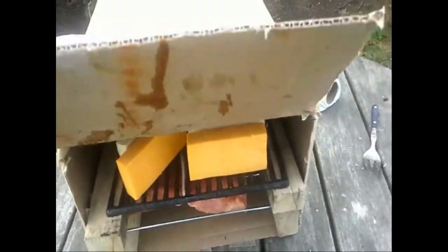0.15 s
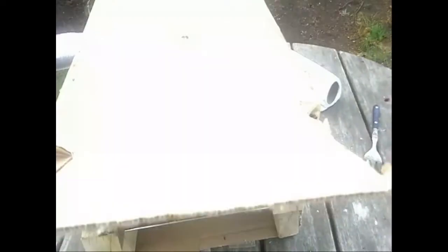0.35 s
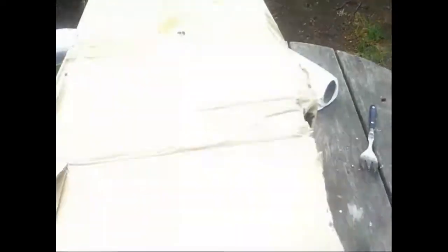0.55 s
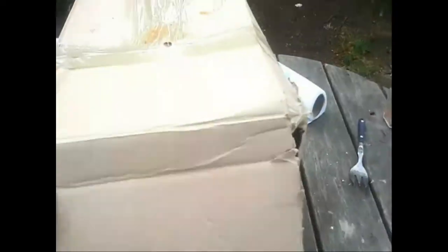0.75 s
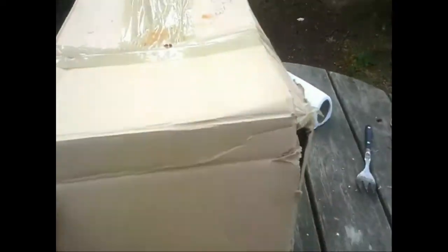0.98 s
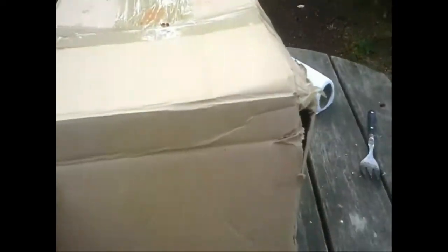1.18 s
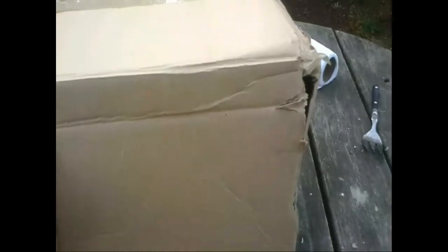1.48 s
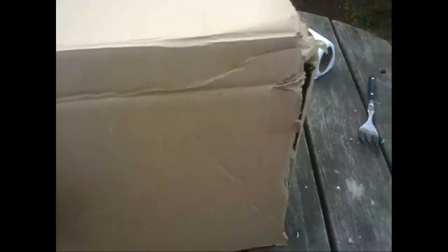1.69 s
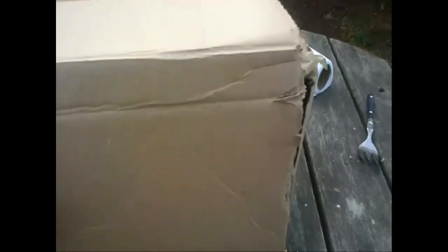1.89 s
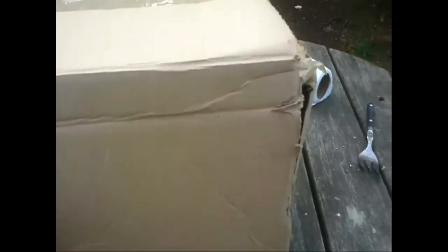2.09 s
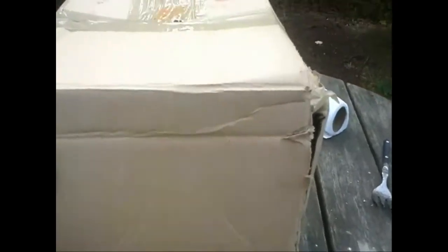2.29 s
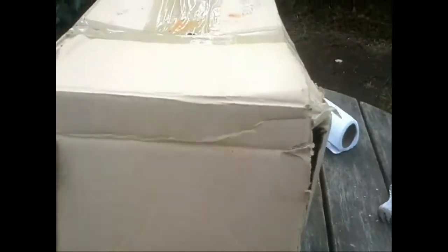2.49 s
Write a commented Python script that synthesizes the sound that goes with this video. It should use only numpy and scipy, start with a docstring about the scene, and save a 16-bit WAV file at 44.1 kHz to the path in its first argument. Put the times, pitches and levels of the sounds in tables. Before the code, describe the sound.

A cardboard flap rubs into its box, jams with a crunch, then scrapes closed.

```python
"""Closing a cardboard box

Short bursts of low thump and hiss, with a brief ring, open the scene. On an outdoor table, a flap slides
in between the box's side walls with a hollow hiss, jams with a crunch, creaks and is pushed home in a
second long scrape. The rubbing is paper fibres catching and letting go, ringing the gap and the panels.
Creases snap, the walls knock as they flex, and handling shakes the box with a low rumble."""
import sys
import numpy as np
from scipy import signal
from scipy.fft import rfft, irfft
from scipy.io import wavfile
from scipy.ndimage import uniform_filter1d, map_coordinates

SR = 44100
rng = np.random.default_rng(int(sys.argv[2]) if len(sys.argv) > 2 else 0)


def to_wav(s):
    """Save 16-bit WAV."""
    ch = np.atleast_2d(s).T  # columns
    pcm = np.round(np.clip(ch, -1, 1) * 32767)  # PCM
    wavfile.write(sys.argv[1], SR, pcm.astype(np.int16))


N = 116865
T = np.arange(N) / SR


def from_db(db):
    """Decibels to gain."""
    return 10 ** (np.asarray(db) / 20)


def unit_power(x):
    """Scale to an RMS of one."""
    return x / np.sqrt(np.mean(x ** 2) + 1e-20)


def fader(curve):
    """Gain riding a (time_s, level_db) curve, silent outside it."""
    time_s, level_db = np.transpose(curve)
    return from_db(np.interp(T, time_s, level_db, left=-140, right=-140))


def burst(start_s, length_s, attack_s, fall_db_per_s):
    """Envelope that rises smoothly and begins to die away length_s after its start."""
    rise = np.clip((T - start_s) / attack_s, 0, 1) ** 2
    return rise * from_db(-fall_db_per_s * np.maximum(T - start_s - length_s, 0))


def noise():
    """White noise."""
    return rng.standard_normal(N)


def colour(x, spectrum):
    """Minimum-phase EQ through (freq_hz, gain_db) points; unit power."""
    freq_hz, gain_db = np.transpose(spectrum)
    bins_hz = np.maximum(np.arange(N + 1) * SR / (2 * N), 1)
    gain = from_db(np.interp(np.log(bins_hz), np.log(freq_hz), gain_db))
    gain /= np.sqrt(1 + (freq_hz[0] / 2 / bins_hz) ** 4)  # low cut an octave under the first point
    cepstrum = irfft(np.log(gain))[:N]
    cepstrum[1:] *= 2
    response = np.exp(rfft(cepstrum, 2 * N))
    return unit_power(irfft(rfft(x, 2 * N) * response)[:N])


def resonate(x, modes):
    """Parallel resonances of alternating polarity, each with its own share of the power."""
    out = 0
    for k, (pitch_hz, width_hz, level_db) in enumerate(modes):
        radius = np.exp(-np.pi * width_hz / SR)
        poles = [1, -2 * radius * np.cos(2 * np.pi * pitch_hz / SR), radius * radius]
        ring = unit_power(signal.lfilter([1, 0, -1], poles, x))
        out += (-1) ** k * from_db(level_db) * ring
    return unit_power(out)


def steady(x):
    """Even out the swells of a narrow-band vibration; unit power."""
    x = unit_power(x)
    local_power = uniform_filter1d(x * x, size=1300)
    return unit_power(x / np.sqrt(local_power + 1e-2))


def drift(rate_hz):
    """Smooth random wandering with a spread of one."""
    step = 40
    pole = np.exp(-2 * np.pi * rate_hz * step / SR)
    count = N // step + 2
    slow = signal.lfilter([1], [1, -2 * pole, pole * pole], rng.standard_normal(2 * count))[count:]
    return np.interp(np.arange(N) / step, np.arange(count), unit_power(slow))


def board_paths(x, count=14, depth=0.75, delay_range_s=(0.0007, 0.0045)):
    """As the contact point travels, paths through the board come and go, so the colour keeps shifting."""
    paths = 0
    for delay_s in rng.uniform(*delay_range_s, count):
        paths += drift(rate_hz=8) * np.pad(x, (int(delay_s * SR), 0))[:N]
    return unit_power(x + depth * unit_power(paths))


def friction(judder_db=1.54, grains_per_s=3500, grain_spread_db=3, hiss_gain=0.7):
    """Fibres catch and let go: tiny clicks over hiss, bunched by uneven stick and slip."""
    sizes = from_db(grain_spread_db * np.minimum(rng.exponential(1, N), 4))
    polarity = rng.choice([-1, 1], N)
    grains = unit_power(sizes * polarity * (rng.random(N) < grains_per_s / SR))
    rub = board_paths(grains + hiss_gain * noise())
    return unit_power(rub * from_db(judder_db * drift(rate_hz=146)))


# Tone of the outdoor air: freq_hz, gain_db
AIR_EQ = [(25, 0), (100, -10), (240, -18), (2000, -27), (2330, -12.5), (3000, -24), (3700, -15),
          (4700, -21), (10000, -21), (12500, -27), (16000, -39)]


def air():
    """Still air lays a faint noise bed under the scene."""
    return from_db(-88) * colour(noise(), AIR_EQ)


# Short bursts of thump and hiss: start_s, length_s, hiss_db, ring_db, thump_db
THUMP_BURSTS = [(-.01, 0.0083, -64, -64.5, -59), (0.067, 0.0079, -61, -54, -56),
                (0.096, 0.026, -65.5, -69.5, -54.5), (0.142, 0.046, -67.5, -75, -56.5),
                (0.204, 0.01, -65.5, -80, -54), (0.413, 0.025, -65.5, -73, -51),
                (0.466, 0.033, -62, -55.5, -53.5), (0.506, .032, -61, -81, -50.5),
                (0.544, 0.049, -68, -65, -52), (0.607, 0.033, -56, -56, -56),
                (0.687, 0.04, -62, -68.5, -56), (0.772, 0.025, -61, -62, -53),
                (0.819, 0.0051, -62, -66, -50.5), (0.849, 0.015, -59.5, -75, -49),
                (0.932, 0.014, -64, -66, -62), (0.967, 0.011, -58.5, -65, -56)]
# Hissy top and soft low end of a burst: freq_hz, gain_db
HISS_EQ = [(120, -42), (200, -11), (278, -12), (387, -11.5), (432, -8), (1120, -10.5), (1590, -7.5),
           (2510, -5.5), (3830, -9), (4520, -4.5), (5940, -15), (7540, -12), (16000, -13.5)]
THUMP_EQ = [(20, -22), (40, 10), (75, -9.5), (130, -20.5), (250, -27.5), (600, -56.5)]
# Brief ring in each burst: pitch_hz, width_hz, level_db
RING_MODES = [(1540, 77, -7), (1830, 60, -28), (2360, 54, -11), (2830, 57, -18), (3740, 320, 4),
              (4470, 240, -17), (5230, 130, -2.5), (5980, 130, 3), (6760, 530, 0)]


def thump_bursts():
    """Short, gated-sounding bursts of low thump and hiss, with a brief ring."""
    start_s, length_s, hiss_db, ring_db, thump_db = np.transpose(THUMP_BURSTS)[:, :, None]
    top_envelopes = burst(start_s, length_s, attack_s=0.013, fall_db_per_s=665)
    low_envelopes = burst(start_s, length_s, attack_s=0.006, fall_db_per_s=1160)
    hiss = (from_db(hiss_db) * top_envelopes).sum(axis=0) * colour(friction(judder_db=1.3), HISS_EQ)
    ring = (from_db(ring_db) * top_envelopes).sum(axis=0) * resonate(friction(judder_db=-0.5), RING_MODES)
    thump = (from_db(thump_db) * low_envelopes).sum(axis=0) * steady(colour(noise(), THUMP_EQ))
    return hiss + ring + thump


# Creases giving way: start_s, level_db, pitch_hz, width_hz
CRACKS = [(0.539, -56, 2380, 200), (0.591, -37, 5340, 1500), (1.014, -42, 2960, 2500),
          (1.337, -31.5, 4040, 1500), (1.49, -28, 6000, 1300), (1.601, -20.5, 8400, 1500),
          (1.616, -24, 1570, 397), (1.625, -23, 4400, 1000), (1.642, -23.5, 3750, 1300),
          (1.679, -27, 5400, 2000), (1.7009, -26.5, 1390, 890), (1.753, -29, 5440, 4500),
          (1.827, -25.5, 1700, 1700), (1.83, -42, 4000, 1500), (2.411, -26, 5170, 1390),
          (2.4298, -18.5, 3480, 300), (2.44, -32.5, 4007, 399.7), (2.541, -33, 3940, 2000),
          (2.565, -32, 5070, 2020)]


def cracks():
    """A crease gives way in a few milliseconds of snapping fibres: a ring over a broad crunch."""
    crunch = 0.54 * colour(noise(), JAM_EQ)  # shares the tone of the jamming edge
    out = 0
    for start_s, level_db, pitch_hz, width_hz in CRACKS:
        snap = unit_power(crunch + resonate(noise(), [(pitch_hz, width_hz, 0)]))
        envelope = burst(start_s, length_s=0.00067, attack_s=0.0022, fall_db_per_s=2000)
        out += from_db(level_db) * envelope * snap
    return out


# Swell of the passing edge: time_s, level_db
SWEEP_FADER = [(.54, -78), (.57, -51.5), (.597, -45.5), (.622, -42.5), (.648, -54.5), (.675, -79)]
# Its tone: freq_hz, gain_db
SWEEP_EQ = [(88, -50), (150, -17), (235, 5.5), (321, -10), (923, -20), (1560, 1.5), (2870, -21), (3490, 1),
            (5150, 0.5), (5910, -9), (6770, 0.5), (7470, -10.5), (11300, -20), (12900, -9), (16000, -22)]


def sweep():
    """The flap's edge sweeps past the wall in one quick swish."""
    return fader(SWEEP_FADER) * colour(friction(judder_db=2.5), SWEEP_EQ)


# Swells of handling rumble: time_s, level_db
RUMBLE_FADER = [(.99, -76), (1.04, -59), (1.14, -56.5), (1.24, -51), (1.29, -62), (1.36, -48), (1.5, -60),
                (1.62, -48.5), (1.76, -47), (1.9, -46), (1.98, -49), (2.06, -47), (2.16, -51), (2.32, -46),
                (2.39, -54), (2.47, -46.5), (2.56, -52), (2.65, -54)]
# Its deep tone: freq_hz, gain_db
RUMBLE_EQ = [(20, -20), (28, -15.5), (39, 10.5), (56, -6), (75, -3.5), (115, -16), (250, -18), (600, -34)]


def rumble():
    """Handling shakes the whole box."""
    return fader(RUMBLE_FADER) * steady(colour(noise(), RUMBLE_EQ))


# Contour of the sliding hiss, ahead of its trim: time_s, level_db
SLIDE_FADER = [(1.006, -55), (1.016, -54), (1.08, -46), (1.115, -42.5), (1.18, -43.5), (1.26, -38.5),
               (1.29, -41), (1.35, -42.5), (1.53, -38), (1.555, -43.5), (1.65, -38.5), (1.79, -46),
               (1.91, -40.5), (2.0, -37), (2.2, -41.5), (2.46, -38.5), (2.57, -36.5), (2.65, -41.5)]
# Its tone: freq_hz, gain_db
SLIDE_EQ = [(88, -51.5), (150, -8), (315, -2.5), (524, 2.5), (689, -27), (1210, -29), (2310, 9.5),
            (3160, 0.5), (3490, -12.5), (3770, -2.5), (5790, 3.5), (7470, -7.5), (11000, -9), (12400, -6.5),
            (16000, -12)]


def slide(trim_db=-7):
    """Board hisses as it slides smoothly on board."""
    return fader(SLIDE_FADER) * from_db(trim_db) * colour(friction(judder_db=1.6), SLIDE_EQ)


# The edge scraping as it enters, jams and is pushed home: time_s, level_db
ENTRY_FADER = [(1.008, -72), (1.017, -42.5), (1.04, -47.5), (1.075, -40), (1.125, -50.5), (1.30, -53.5),
               (1.347, -36), (1.372, -44), (1.39, -45.5), (1.495, -41), (1.532, -37), (1.554, -50)]
JAM_FADER = [(1.559, -50), (1.57, -36), (1.586, -33), (1.604, -27.5), (1.646, -28.5), (1.66, -35),
             (1.684, -31), (1.701, -37.5), (1.715, -47), (1.754, -36.5), (1.784, -50), (1.828, -37),
             (1.86, -48), (1.948, -50.5)]
PUSH_FADER = [(1.959, -56.5), (2.016, -42.5), (2.049, -34), (2.07, -38.5), (2.108, -38.5), (2.128, -32.5),
              (2.175, -39.5), (2.23, -37.5), (2.292, -37), (2.32, -38), (2.38, -36), (2.43, -33.5),
              (2.46, -37), (2.51, -45), (2.57, -50.5), (2.65, -48.5)]
# Tone of each stroke: freq_hz, gain_db
ENTRY_EQ = [(59, -61), (100, -24), (156, -40), (239, 1), (634, -1), (736, -4), (1230, -8), (1580, 4),
            (3050, -5.5), (3620, 5.5), (4980, -1), (6560, -4), (7770, -3), (13800, -12), (16000, -16.5)]
JAM_EQ = [(47, -18), (80, -30), (107, -1.5), (265, -7), (346, -9), (575, -7.5), (687, 0.5), (820, -14),
          (937, -3), (1400, -3), (1560, 1), (1740, -6), (1900, -2), (2220, -7), (2900, -8), (3870, -2),
          (6740, -10.5), (10500, -11.5), (11500, -16.5), (12500, -16), (16000, -28)]
PUSH_EQ = [(59, -55), (100, -13.5), (210, -17), (271, -13), (452, -18), (583, -6), (676, -11.5), (818, -24),
           (910, -11.5), (1280, -8.5), (1550, -11), (2580, -9.5), (3400, -9), (6020, -11), (7450, -21),
           (9410, -16), (11200, -23), (14700, -20), (16000, -27)]
# Ring of the box panels: pitch_hz, width_hz, level_db
PANEL_MODES = [(275, 75, 1.5), (382, 140, -17), (726, 38, 8.5), (1077, 210, 12.5), (1570, 140, -4),
               (1980, 27, -19), (3600, 900, -8.5)]
# Panel ring against the edge's scrape: entry_db, jam_db, push_db
PANEL_MIX_DB = [-10.5, -10, -15.5]


def scrapes():
    """Three strokes drag the rough cut edge along the walls and set the panels ringing."""
    strokes = [(ENTRY_FADER, ENTRY_EQ), (JAM_FADER, JAM_EQ), (PUSH_FADER, PUSH_EQ)]
    out = 0
    for (curve, spectrum), ring_db in zip(strokes, PANEL_MIX_DB):
        edge = colour(friction(), spectrum)
        panels = from_db(ring_db) * resonate(friction(), PANEL_MODES)
        out += fader(curve) * (edge + panels)
    return out


# How strongly the gap sounds: time_s, level_db
GAP_FADER = [(1.01, -58), (1.08, -52), (1.18, -43), (1.26, -44), (1.29, -44.5), (1.35, -42.5), (1.5, -49),
             (1.56, -51), (1.9, -61.5), (1.98, -44), (2.1, -63), (2.48, -52), (2.65, -52.5)]
# Its hollow resonances: pitch_hz, width_hz, level_db
GAP_MODES = [(546, 77, -13.5), (1820, 93, -12.5), (2353, 220, -8.5), (3505, 170, -4), (4560, 87, -11.5),
             (6100, 150, -36)]


def gap():
    """Rubbing sounds the narrow gap beside the flap."""
    return fader(GAP_FADER) * steady(resonate(friction(judder_db=3.5), GAP_MODES))


# Knocks of the flexing walls: start_s, length_s, level_db
KNOCKS = [(1.082, 0.021, -62), (1.337, 0.019, -40.5), (1.657, 0.072, -46), (1.749, 0.06, -51.5),
          (1.8, 0.049, -48), (1.992, 0.018, -40.5), (2.022, 0.047, -42), (2.084, 0.058, -46.5)]
# Body of a knock: pitch_hz, width_hz, level_db
WALL_MODES = [(266, 22, 2.5), (373, 61, 2), (747, 180, 2)]


def wall_knocks():
    """The walls flex with a hollow knock."""
    envelope = sum(from_db(level_db) * burst(start_s, length_s, attack_s=0.023, fall_db_per_s=495)
                   for start_s, length_s, level_db in KNOCKS)
    return envelope * steady(resonate(noise(), WALL_MODES))


# Bite of the paper rasp: time_s, level_db
RASP_FADER = [(1.562, -53), (1.574, -43.5), (1.603, -29), (1.625, -35.5), (1.66, -44.5), (1.685, -41.5),
              (1.71, -62)]
# Its bright resonances: pitch_hz, width_hz, level_db
RASP_MODES = [(7000, 500, -13.5), (8550, 460, -2.5), (9400, 610, 2), (10500, 320, 0)]


def rasp():
    """The paper face rasps brightly as the jam begins."""
    return fader(RASP_FADER) * resonate(friction(), RASP_MODES)


# Ring of the seam: pitch_hz, width_hz, level_db
SEAM_MODES = [(1970, 270, -7), (2340, 160, -10), (3100, 87, 1), (3500, 130, -5.5), (4190, 140, 1),
              (8010, 200, -1.5), (10200, 250, -19)]


def seam(trim_db=-9.5):
    """The seam rings under the scrape of the last push."""
    return fader(PUSH_FADER) * from_db(trim_db) * resonate(friction(), SEAM_MODES)


# Swell and bend of the front panel's drone: time_s, level_db, pitch_hz
DRONE_CURVE = [(2.09, -74, 627), (2.125, -40.5, 621.5), (2.179, -45, 640.4), (2.262, -38, 639.7),
               (2.331, -44, 653.7), (2.411, -35.5, 684), (2.45, -52, 637), (2.5, -81, 664)]
# Its resonances at the base pitch: pitch_hz, width_hz, level_db
DRONE_MODES = [(570, 50, -8), (644, 70, 7.5), (937, 76, -2), (1547, 110, 2.5)]


def panel_drone(base_hz=650):
    """The front panel drones as it is pushed home, rising in pitch as it tightens."""
    time_s, level_db, pitch_hz = np.transpose(DRONE_CURVE)
    tone = steady(resonate(friction(judder_db=4.6), DRONE_MODES))
    playhead = np.cumsum(np.interp(T, time_s, pitch_hz) / base_hz)  # varispeed bends all modes together
    bent = map_coordinates(tone, [playhead], order=3, mode="wrap")
    return fader(np.c_[time_s, level_db]) * bent


# Near reflections between flap and walls: delay_ms, gain
REFLECTIONS = [(0.478, 0.064), (0.831, -0.048), (1.27, 0.03), (2.6, 0.047)]


def box_reverb(x, t60_s=0.11, wet_db=-16.5):
    """Add a few near reflections and a short, dense reverberation inside the box."""
    early = sum(gain * np.interp(T - delay_ms / 1000, T, x, left=0) for delay_ms, gain in REFLECTIONS)
    impulse = noise() * burst(start_s=0.0013, length_s=0, attack_s=0.0027, fall_db_per_s=60 / t60_s)
    tail = signal.fftconvolve(x, impulse / np.linalg.norm(impulse))[:N]
    return x + early + from_db(wet_db) * tail


def scene():
    """Mono mix: cracks and rubbing echo in the box; thumps, knocks, drone, rumble and air stay dry."""
    inside = cracks() + sweep() + slide() + scrapes() + gap() + rasp() + seam()
    foreground = box_reverb(inside) + thump_bursts() + wall_knocks() + panel_drone()
    return (foreground + rumble() + air())[None]


def record(dry, dip_hz=11100, dip_depth=0.68, cutoff_hz=15900):
    """The microphone has a narrow dip in the treble; the top is cut steeply."""
    dip_band = signal.lfilter(*signal.iirpeak(dip_hz, Q=42, fs=SR), dry)
    high_cut = signal.ellip(12, 0.1, 80, cutoff_hz, fs=SR, output="sos")
    return signal.sosfilt(high_cut, dry - dip_depth * dip_band)


dry = scene()
out = record(dry)
to_wav(out)
```